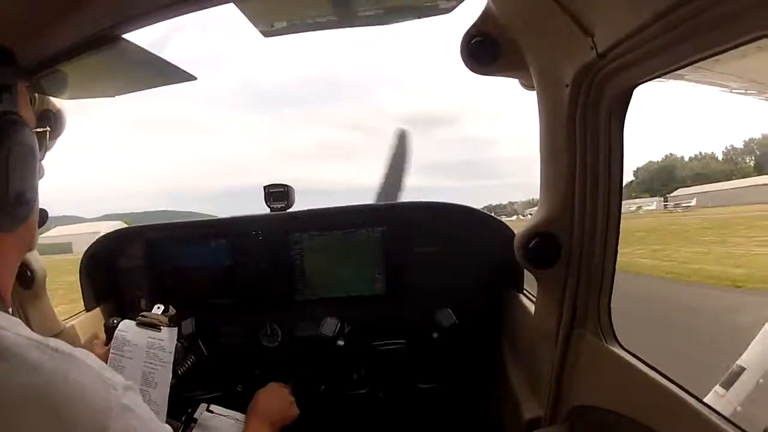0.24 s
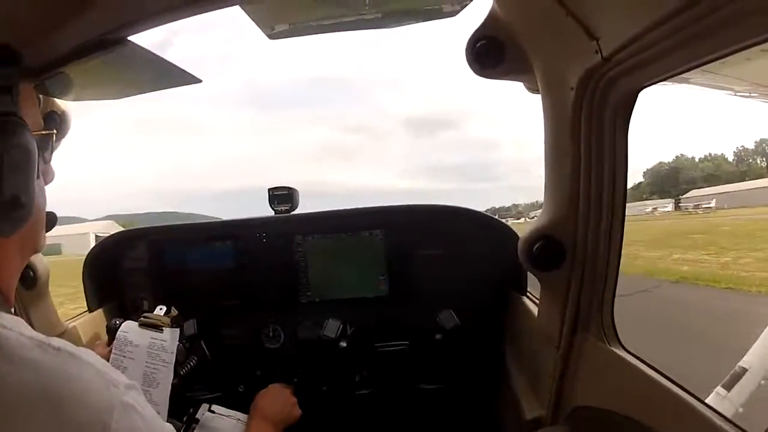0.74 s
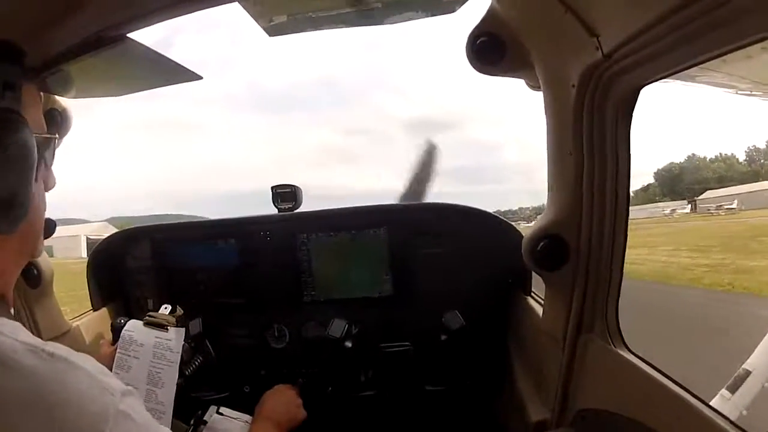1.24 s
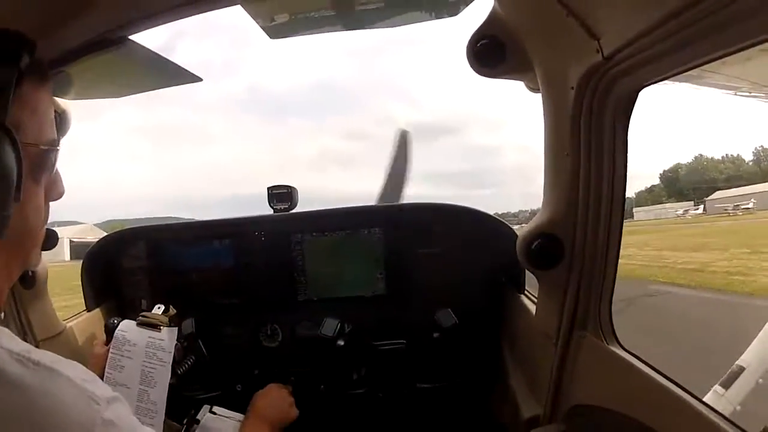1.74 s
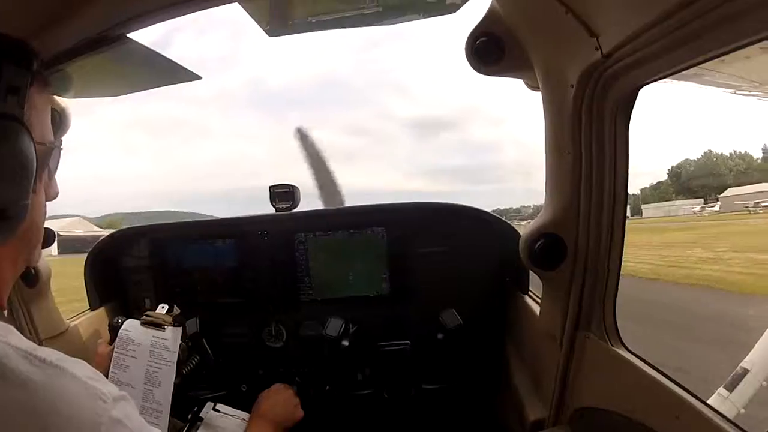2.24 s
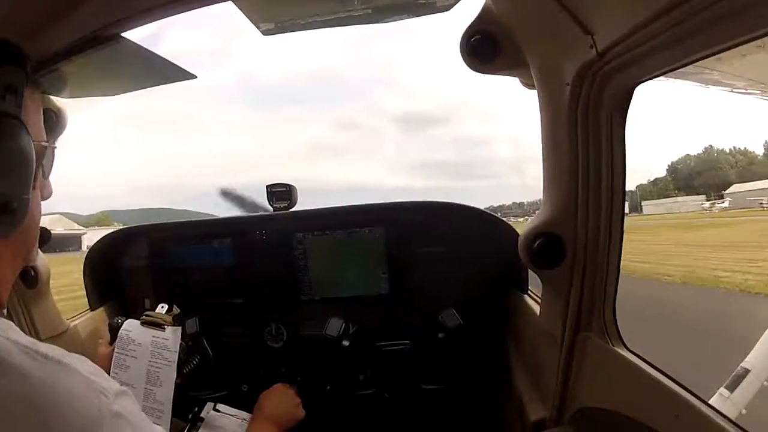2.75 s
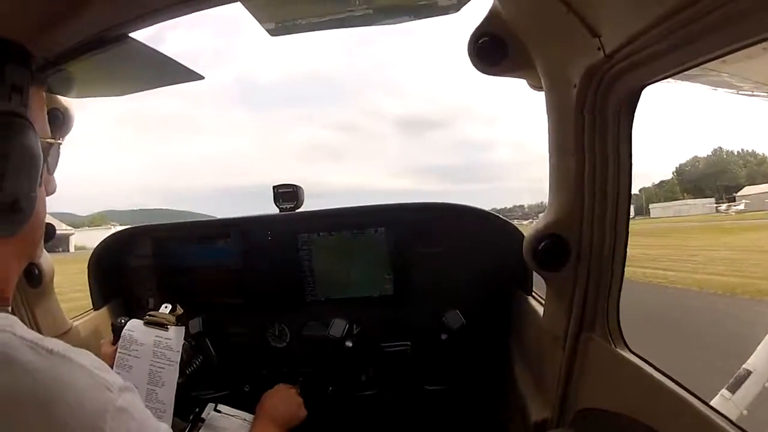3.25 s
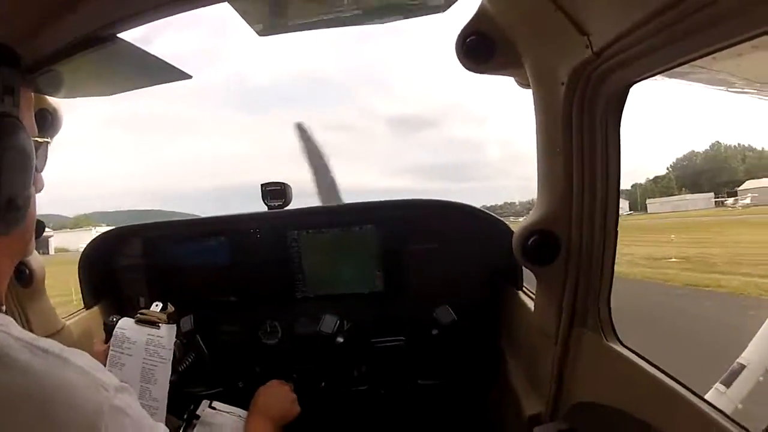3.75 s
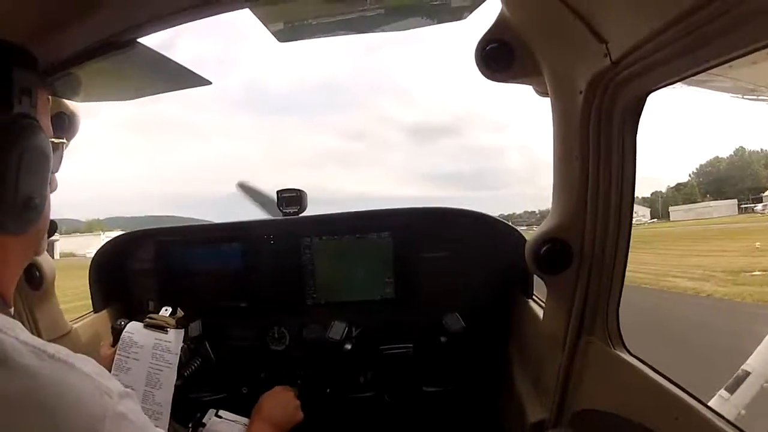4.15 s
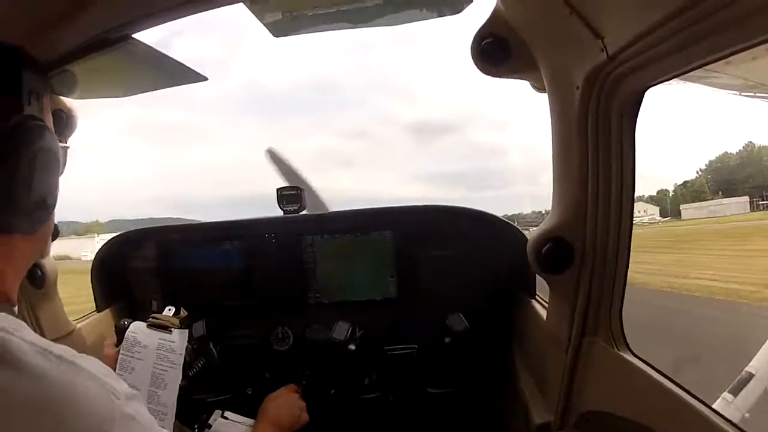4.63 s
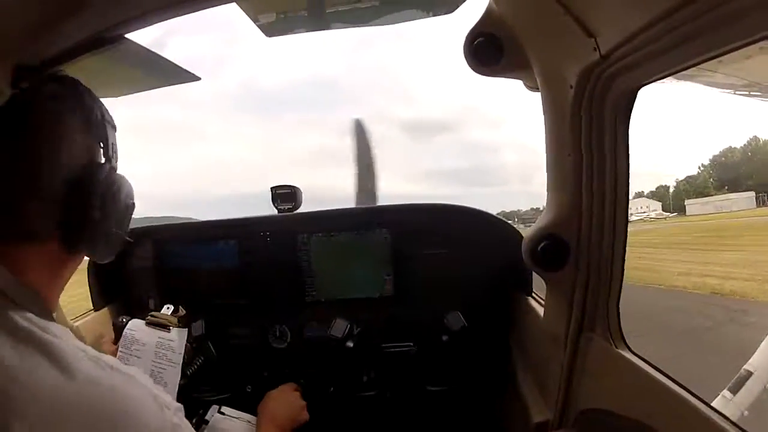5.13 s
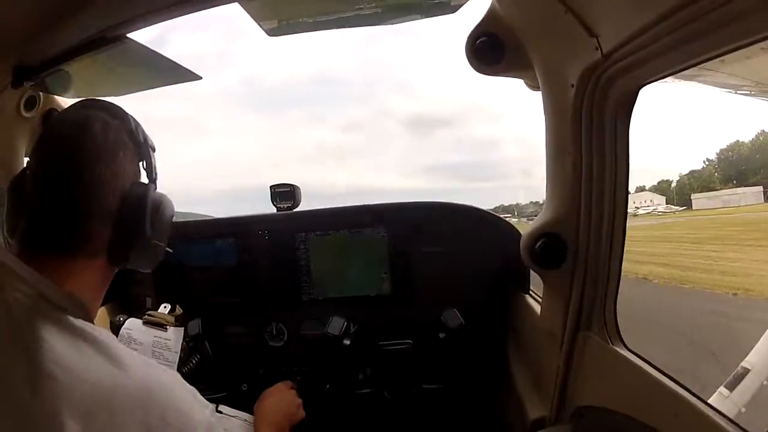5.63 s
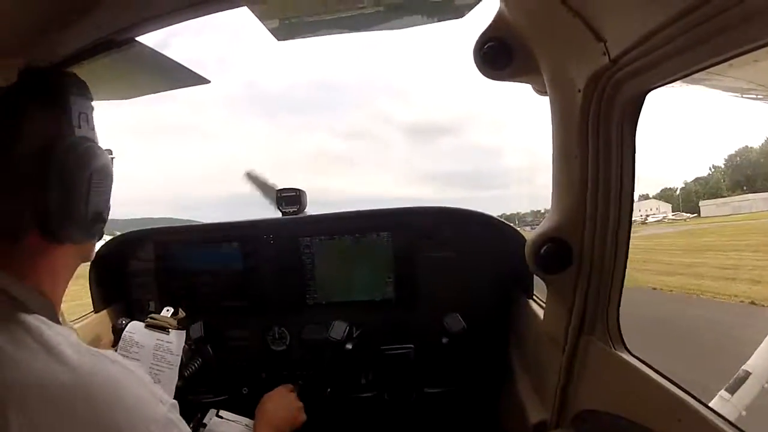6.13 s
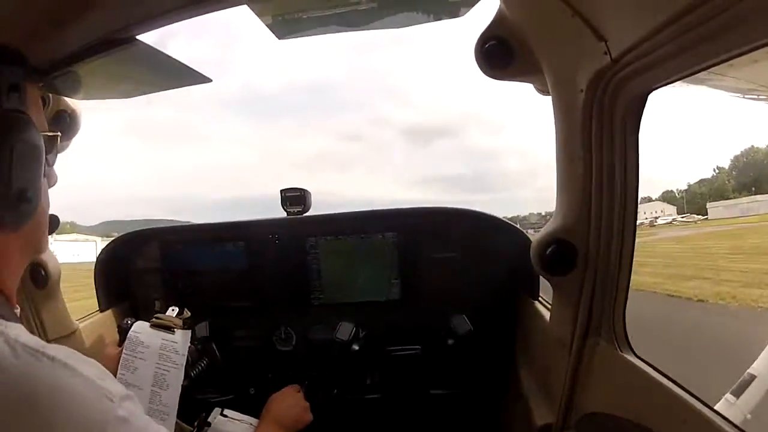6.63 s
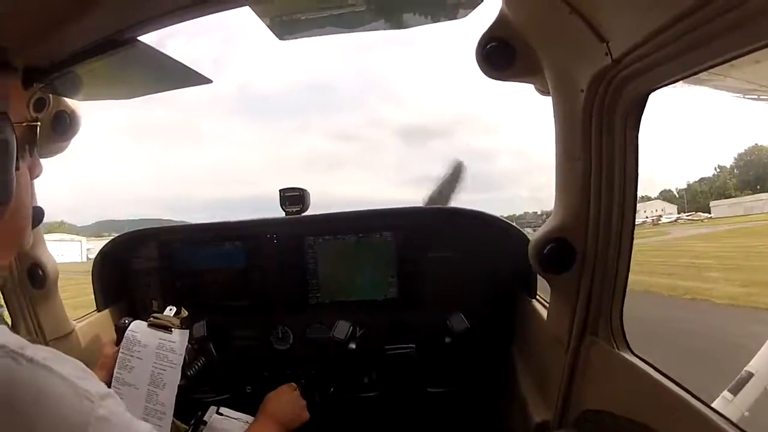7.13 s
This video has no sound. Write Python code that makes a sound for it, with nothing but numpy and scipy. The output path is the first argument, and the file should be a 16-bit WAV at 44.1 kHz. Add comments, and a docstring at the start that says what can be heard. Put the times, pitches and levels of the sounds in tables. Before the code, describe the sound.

Low, fluttering piston-engine vibration in a light aircraft cabin, with gritty, hard plastic-and-metal rattling that comes in clusters and pauses.

```python
"""In the cabin of a light piston airplane taxiing at low power, one microphone in a camera fixed inside.
The airframe shakes about 32 times a second, a near-sine with slow random unevenness. Around each swell
of the shake a loose fitting knocks against its stops (blows into a ringing body) and scrapes between them.
Low engine rumble and a faint ticking hiss (filtered noise and impulses) lie underneath.
The recorder holds 8000 samples a second, which adds a gritty treble."""
import sys
import numpy as np
from scipy import signal
from scipy.fft import rfft, irfft
from scipy.io import wavfile

SR = 44100
rng = np.random.default_rng(int(sys.argv[2]) if len(sys.argv) > 2 else 0)


def store_wav(level_fs):
    """Save 16-bit WAV to argv[1]."""
    pcm = np.round(np.clip(np.atleast_2d(level_fs), -1, 1) * 32767)
    wavfile.write(sys.argv[1], SR, pcm.T.astype(np.int16))


N = 325458  # length in samples


def gain_of(db):
    """Decibels to amplitude."""
    return 10 ** (np.asarray(db) / 20)


def evened(x):
    """Scales to rms 1."""
    return x / np.sqrt(np.mean(x ** 2) + 1e-20)


def spectrum(points, hz):
    """Amplitude of a short spectrum, joined on a log-frequency axis."""
    f, db = np.transpose(points)
    return gain_of(np.interp(np.log(hz + 1), np.log(f + 1), db))


def resonances(modes, hz):
    """Amplitude response of steep-sided resonances whose powers add."""
    powers = (gain_of(db) ** 2 / (1 + ((hz - f) / width) ** 2) ** 2 for f, width, db in modes)
    return np.sqrt(sum(powers))


def causal(gain):
    """The minimum-phase spectrum with this gain: it starts at once and then dies away."""
    log_gain = np.log(np.maximum(gain, 1e-5))
    circle = np.concatenate([log_gain, log_gain[-2:0:-1]])
    return np.exp(np.conj(signal.hilbert(circle)))[:len(gain)]


def coloured(drive, colour):
    """Filters a full-length drive by a spectrum and scales it to rms 1."""
    return evened(irfft(rfft(drive) * colour, N))


def drift(rate_hz):
    """Slow random motion of rms 1, moving at about this rate."""
    hz = np.fft.rfftfreq(N, 1 / SR)
    return coloured(rng.standard_normal(N), hz * np.exp(-hz / rate_hz))


def swell(depth_db=1.4, rate_hz=6.3):
    """A random rise and fall of loudness."""
    return gain_of(depth_db * drift(rate_hz))


def add(mix, start, sound):
    """Mixes a sound in from a sample on."""
    part = mix[max(start, 0):][:len(sound)]
    part += sound[:len(part)]


# The shake at rest, the surge at each knock, and the time constants of its power before and after.
REST_DB, SURGE_DB, BUILD_S, SETTLE_S = -27, -23, 0.032, 0.06
SHAKE_HZ, SAG_HZ_PER_DB = 31.97, 0.11  # a wider swing is a little slower
REBOUND_S = 0.0132  # a knock this soon after another meets a fitting that is still ringing


def shaking(tight_db=4.0):
    """Level of the shake in dB: it surges around every knock, most where the knocks crowd together."""
    t = np.arange(0, N, 64) / SR
    times = np.array(CONTACT_TIMES)[:, 0]
    since = t[:, None] - times
    tight = np.diff(times, prepend=-1) < REBOUND_S
    surges = np.exp(-abs(since) / np.where(since < 0, BUILD_S, SETTLE_S))
    power = gain_of(REST_DB) ** 2 + surges @ gain_of(SURGE_DB + tight_db * tight) ** 2
    return np.interp(np.arange(N) / SR, t, 10 * np.log10(power))


def shake(turns, shake_db, second_db=-25.5, wobble=0.068, wobble_hz=6.55, beat_db=-35.0, beat_hz=3.8):
    """A near-sine swing with a weak overtone; uneven firing pushes it early and late, wide and narrow."""
    angle = 2 * np.pi * (turns + wobble * drift(wobble_hz))  # wobble in turns, rms
    swing = np.sin(angle) + gain_of(second_db) * np.sin(2 * angle)
    size = gain_of(shake_db) + gain_of(beat_db) * drift(beat_hz)
    return size * np.sqrt(2) * swing


RUMBLE_DB = -36.5
# Low thrum of engine and wheels through the cabin floor, relative spectrum: f/Hz, level/dB (per Hz)
FLOOR_THRUM = [(12, -33), (25, -6.5), (48, 0), (66, -6), (90, -6.5), (135, -10.5), (190, -16), (260, -28),
               (340, -37), (700, -46.5)]


def rumble(shake_db, follow=0.51, boom_hz=95, boom_width_hz=30, boom_from_db=-16, boom_db=-36, boom_follow=3.0):
    """Uneven thrum that grows with the shake; the heaviest shaking makes the cabin resonance boom."""
    hz = np.fft.rfftfreq(N, 1 / SR)
    thrum = coloured(rng.standard_normal(N), spectrum(FLOOR_THRUM, hz))
    boom = coloured(rng.standard_normal(N), resonances([(boom_hz, boom_width_hz, 0)], hz))
    thrum_gain = gain_of(RUMBLE_DB + follow * (shake_db - shake_db.mean()))
    boom_gain = gain_of(boom_db + boom_follow * (shake_db - boom_from_db))
    return thrum_gain * thrum + boom_gain * boom


HISS_DB, TICKS_DB = -49, -57
# Engine clatter carried by the structure, relative spectrum: f/Hz, level/dB (per Hz)
CLATTER = [(60, -43), (300, -7), (450, -12), (700, -14), (1000, -7.5), (1400, -15.5), (1700, -1),
           (2400, -7), (3000, -8), (3500, -19), (4000, -31)]
# Resonances that the steady vibration keeps sounding: f/Hz, half width/Hz, level/dB
HUMMING_MODES = [(570, 17, -2), (763, 54, -1), (1127, 136, -0.5), (1898, 44, 6), (2280, 65, 1.5),
                 (2765, 30, -4)]


def hiss(turns, shake_db, throb=0.044, follow=0.27, ticks_per_s=110, spread_db=4.0):
    """Engine clatter carried by the structure: a wash that throbs with the shake, and tiny ticks."""
    hz = np.fft.rfftfreq(N, 1 / SR)
    colour = causal(np.hypot(spectrum(CLATTER, hz), resonances(HUMMING_MODES, hz)))
    wash = rng.standard_normal(N) * (1 + throb * np.sin(2 * np.pi * turns))
    sizes = gain_of(spread_db * np.minimum(rng.exponential(1, N), 3)) * rng.choice([-1, 1], N)
    ticks = sizes * (rng.random(N) < ticks_per_s / SR)
    mix = gain_of(HISS_DB) * coloured(wash, colour) + gain_of(TICKS_DB) * coloured(ticks, colour)
    return mix * gain_of(follow * (shake_db - shake_db.mean()))


TAP_CHANCE, TAP_WITHIN_S, TAP_DB = .45, .045, -24  # a faint tap falls in some of the short gaps between knocks
# Knocks of the loose fitting: t/s, level/dB (relative), hardness (0-1)
CONTACT_TIMES = [(0.0097, -12, 0.84), (0.0253, 4, 0.72), (0.0355, -3.0, 0.34), (0.0527, 0.5, 0.56),
                 (0.081, 1.5, 0.68), (0.11, 0, 0.35), (0.2448, -9.5, 0.52), (0.261, -4, 0.2),
                 (0.2896, 4.0, 0.58), (0.3165, -14, 0.8), (0.3272, 5.0, 0.68), (0.3398, -9, 0),
                 (0.3538, 0.5, 0.54), (0.388, -2, 0.71), (0.4074, -0.5, 0.37), (0.4468, -10.5, 0.26),
                 (0.4626, 2.5, 0.7), (0.4755, -1.5, 0.3), (0.5025, -17, 0.7), (0.5166, 3.5, 0.71),
                 (0.532, -3.0, 0.35), (0.5691, 3.5, 0.76), (0.5803, 2, 0.6), (0.5966, -2.5, 0.3),
                 (0.612, -4.0, 0.3), (0.6384, -1, 0.5), (0.645, 1.5, 0.65), (0.6618, -3.0, 0.3),
                 (0.6768, -5.5, 0.36), (0.718, 3.5, 0.81), (0.7319, -4.5, 0.31), (0.7452, -2.5, 0.42),
                 (0.7754, -1, 0.6), (0.7972, -4.0, 0.2), (1.0677, -2.5, 0.66), (1.091, -9.5, 0.1),
                 (1.1397, -1, 0.5), (1.4301, 1.0, 0.53), (1.4464, -8.5, 0.1), (1.4619, 2, 0.69),
                 (1.4877, 5.5, 0.67), (1.5349, -2.5, 0.54), (1.5575, -1.5, 0.63), (1.5869, -1.5, 0.29),
                 (1.684, 2.5, 0.69), (1.742, -1.5, 0.62), (1.7701, -6.5, 0.27), (1.8073, -0.5, 0.55),
                 (1.8375, -1.5, 0.37), (1.8733, 0.0, 0.6), (1.9017, -3.5, 0.24), (2.493, 2.5, 0.49),
                 (2.518, 1.5, 0.3), (2.561, -3.5, 0.47), (2.8565, 2.0, 0.62), (2.8935, 3.0, 0.83),
                 (2.9052, -4.5, 0.1), (2.9383, -18, 0.7), (2.9547, 4.0, 0.67), (2.9679, -4, 0.13),
                 (2.987, 1, 0.54), (3.0183, 0.0, 0.29), (3.2307, 0.0, 0.6), (3.2566, 0.0, 0.36),
                 (3.2906, 1.0, 0.57), (3.3163, -7.5, 0), (3.4755, 4.0, 0.54), (3.5362, 0.5, 0.59),
                 (3.6622, 2.5, 0.64), (3.7192, -0.5, 0.5), (3.7644, 1.5, 0.74), (3.774, -1.5, 0.23),
                 (3.785, -3, 0.51), (3.8285, 5.5, 0.74), (3.842, -2.5, 0.28), (3.8527, -7, 0.1),
                 (3.885, 1, 0.75), (3.9078, -0.5, 0.48), (3.923, 3.5, 0.5), (3.9868, -14, 0.46),
                 (4.2309, 3.5, 0.49), (4.251, -12, 0), (4.2896, 0.0, 0.64), (4.3159, -6.0, 0.2),
                 (4.483, -7.5, 0.39), (4.734, 0.5, 0.58), (4.7521, -8.0, 0), (4.7908, -5, 0.58),
                 (4.817, -1, 0.32), (4.8457, 2.5, 0.64), (4.8888, 3, 0.79), (4.8967, -2.5, 0.2),
                 (4.9073, -5, 0.32), (4.9922, -4, 0.38), (5.1691, -2.5, 0.51), (5.2407, 1.0, 0.5),
                 (5.2669, -3.5, 0.1), (5.2754, -3.0, 0.72), (5.297, 0.5, 0.63), (5.3672, -0.5, 0.57),
                 (6.5349, 4.0, 0.58), (6.5725, 4.5, 0.73), (6.5984, 4.5, 0.68), (6.6578, -2.5, 0.46),
                 (6.6928, -1.0, 0.29), (6.7206, 0.5, 0.62), (6.784, -1.5, 0.55), (7.1609, 3.5, 0.53),
                 (7.1861, -2.0, 0.22), (7.2238, 0, 0.6), (7.2444, -8.0, 0.09), (7.2828, 2.0, 0.66),
                 (7.3432, 0.5, 0.58), (7.3726, -5.0, 0.27)]


def contacts():
    """Every knock and faint tap as (t/s, level/dB, hardness 0-1, rebound 0-1)."""
    rows, before = [], -1
    chances = rng.random((len(CONTACT_TIMES), 2))
    for (s, db, hardness), (luck, place) in zip(CONTACT_TIMES, chances):
        gap = s - before
        rebound = 1 / (1 + (gap / REBOUND_S) ** 6)
        rows.append((s, db, hardness, rebound))
        if REBOUND_S < gap < TAP_WITHIN_S and luck < TAP_CHANCE:
            rows.append((s - gap * (.5 + place) / 2, TAP_DB, .5, 0))
        before = s
    return rows


def spread(hz, centre_hz=1750, width_hz=1500):
    """Bending waves travel at unequal speeds, so a blow takes a cycle to build up: an all-pass."""
    return np.exp(-2j * np.arctan2(hz * width_hz, centre_hz ** 2 - hz ** 2))


def chatter(hz, hardness, bounce=0.85, from_hardness=0.73, fade=0.072,
            gaps_s=(.0009, .0019, .0036), shares=(.6, 1, .35)):
    """Spectrum of a contact that bounces within a few ms; the hardest knocks bounce most."""
    sizes = bounce * np.array(shares) / (0.5 + np.exp((from_hardness - hardness) / fade))
    delays = np.array(gaps_s) * (1 + 0.29 * rng.uniform(-0.97, 1, len(gaps_s)))
    bounces = sizes @ np.exp(-2j * np.pi * delays[:, None] * hz)
    return (1 + bounces) / np.sqrt(1 + sum(sizes ** 2))


KNOCK_DB = 23
# What the fitting and its housing ring with: f/Hz, half width/Hz, level/dB
FITTING_MODES = [(95, 38, -7), (164, 59.5, -1.5), (237, 49.7, -2.5), (654, 56, -17), (845, 88, -7.5),
                 (1124, 90.4, 0), (1225, 64, -11.5), (1669, 182, 0), (1925, 77, -4.5), (2070, 116, -2),
                 (2230, 74, -6.5), (2515, 72, -9.5), (2777, 51, -12), (3040, 91, -18), (3498, 94, -16.5)]
# Colour change of a knock from the softest to the hardest contact: f/Hz, level/dB
HARD_CONTACT = [(100, -13), (250, -14.5), (420, -5), (620, 10), (850, -12.5), (1200, -9.5), (1700, 12.5),
                (2000, 13), (2350, 33.5), (2770, -3), (3450, 20.5)]
# Colour change of a quick rebound, less thud and more click: f/Hz, level/dB
QUICK_REBOUND = [(100, 2.5), (200, -7.5), (420, 0), (620, 11.5), (850, -0.5), (2770, -2), (3450, 8)]


def knocks(hits, size=2048, thud_hz=400, scatter_db=1.6, detune=0.021):
    """Each contact is a sharp blow into the body; hard blows are brighter, soft ones mostly thud."""
    hz, out = np.fft.rfftfreq(size, 1 / SR), np.zeros(N)
    crack = 1 - 1 / (1 + (hz / thud_hz) ** 4)  # weighting that leaves out the thud
    plain = np.linalg.norm(resonances(FITTING_MODES, hz) * crack)
    for s, db, hardness, rebound in hits:
        # the point of contact shifts a little, and with it the share and pitch of each mode
        spot = rng.standard_normal((len(FITTING_MODES), 2))
        modes = [(f * (1 + detune * bend), width, level + scatter_db * shift)
                 for (f, width, level), (shift, bend) in zip(FITTING_MODES, spot)]
        contact_colour = spectrum(HARD_CONTACT, hz) ** (hardness - .5)
        rebound_colour = spectrum(QUICK_REBOUND, hz) ** rebound
        gain = resonances(modes, hz) * contact_colour * rebound_colour
        start, rest = divmod(s * SR, 1)
        part_sample_delay = np.exp(-2j * np.pi * hz * rest / SR)
        blow = causal(gain) * spread(hz) * chatter(hz, hardness) * part_sample_delay
        # hard blows land on one stop, dull ones on the opposite one
        side = -1 if hardness > .5 else 1
        # strength is that of the crack above the thud
        strength = gain_of(KNOCK_DB + db) * plain / np.linalg.norm(blow * crack)
        add(out, int(start), side * strength * irfft(blow))
    return out


def cabin(x, wet_db=-24.0, t60=0.05, jolt_hz=60, jolt_t60=0.11, jolt_db=-54.5):
    """Blows die out through the surrounding panels, and jolt the camera on its mount."""
    t = np.arange(4096) / SR
    tail = rng.standard_normal(len(t)) * gain_of(-60 * t / t60)
    jolt = np.sin(2 * np.pi * jolt_hz * t) * gain_of(jolt_db - 60 * t / jolt_t60)
    response = gain_of(wet_db) * tail / np.linalg.norm(tail) + jolt
    return x + signal.oaconvolve(x, response)[:N]


SCRAPE_DB = -31.5


def scrape(hits, grains_per_s=450, from_hardness=.72, fade=0.035, groan=(640, 130, -3)):
    """The fitting slides between its stops around the hard knocks: fine crackle into the same body."""
    hz, slide = np.fft.rfftfreq(N, 1 / SR), np.zeros(N)
    stroke = np.hanning(int(.07 * SR))
    for s, db, hardness, _ in hits:
        loose = 1 / (1 + np.exp((from_hardness - hardness) / fade))
        add(slide, int(s * SR) - len(stroke) // 3, gain_of(db) * loose * stroke)
    grains = rng.standard_normal(N) * (rng.random(N) < grains_per_s / SR)
    colour = causal(resonances([*FITTING_MODES, groan], hz))  # groan: f/Hz, half width/Hz, level/dB
    return gain_of(SCRAPE_DB) * slide * coloured(grains, colour)


def scene():
    """Shake, rumble, hiss, knocks and scrape at one microphone in the cabin."""
    shake_db = shaking()
    turns = np.cumsum(SHAKE_HZ - SAG_HZ_PER_DB * (shake_db - shake_db.mean())) / SR
    engine = shake(turns, shake_db) + rumble(shake_db) + hiss(turns, shake_db) * swell()
    hits = contacts()
    return (engine + scrape(hits) + cabin(knocks(hits)))[None]


HOLD_HZ, CLOCK_HZ, EDGE_HZ = 8000, 48000, 15700  # sample-and-hold rate, output clock, band limit


def record(dry):
    """Samples slowly and holds each value, mirroring sound into the treble; then overload and band limit."""
    slow = signal.resample_poly(dry[0], HOLD_HZ, SR, window=("kaiser", 3))
    steps = np.repeat(slow, CLOCK_HZ // HOLD_HZ)
    held = signal.resample_poly(steps, SR, CLOCK_HZ)[:N]
    clipped = np.clip(held, -.93, .93)
    band_limit = signal.firwin(255, EDGE_HZ, window=("kaiser", 9), fs=SR)
    return signal.oaconvolve(clipped, band_limit, "same")[None]


dry = scene()
out = record(dry)
store_wav(out)
```